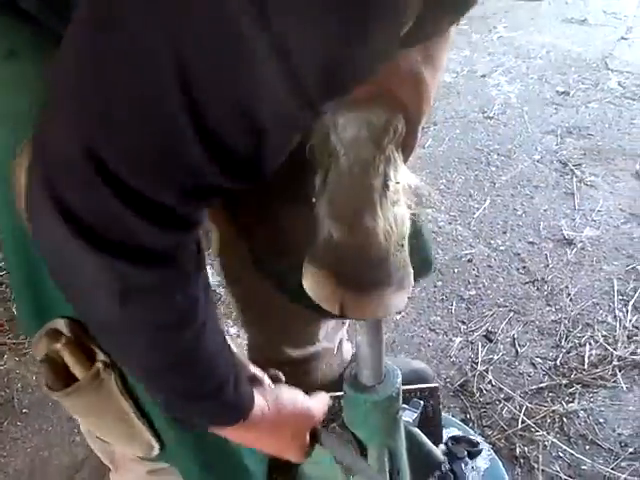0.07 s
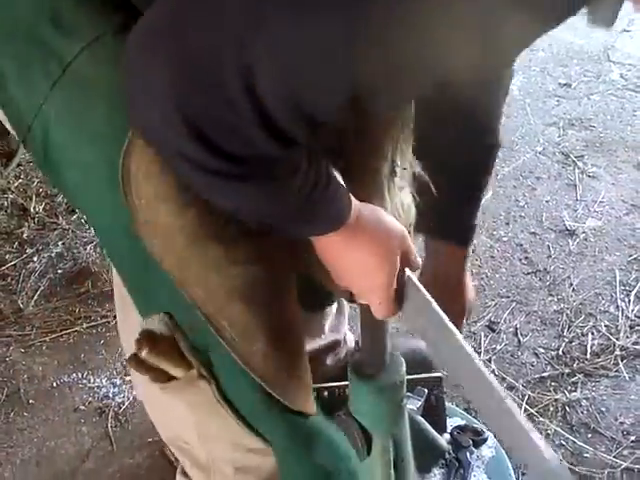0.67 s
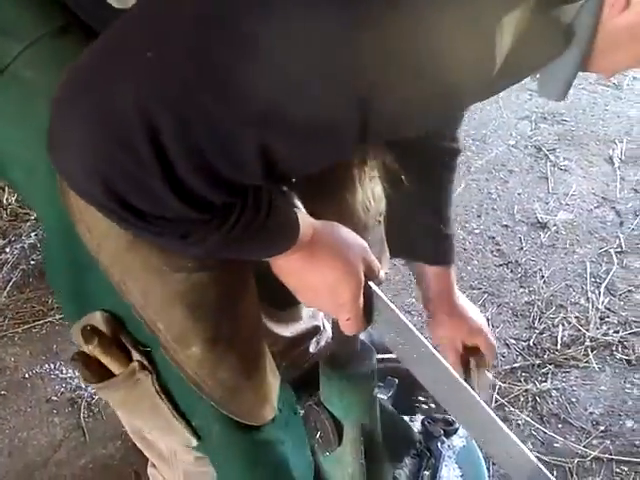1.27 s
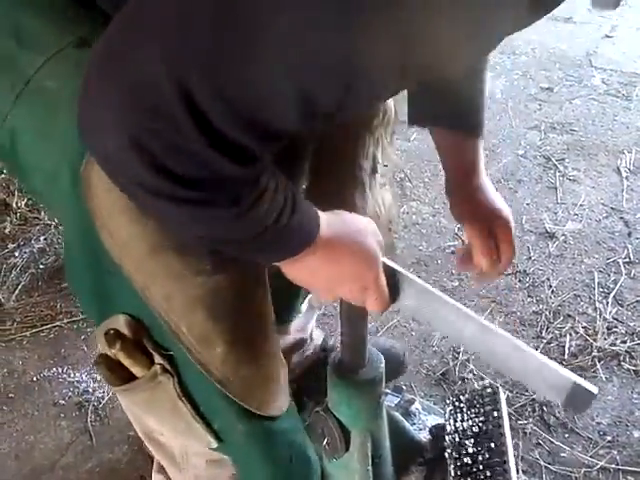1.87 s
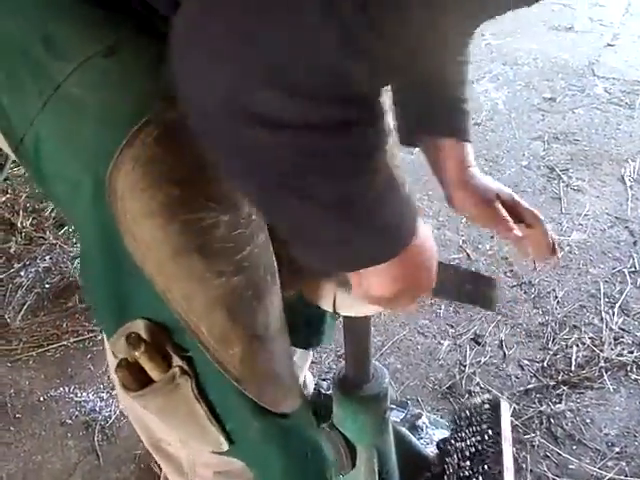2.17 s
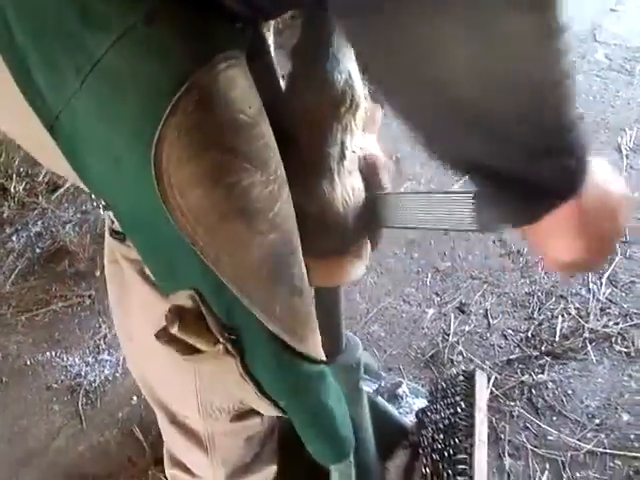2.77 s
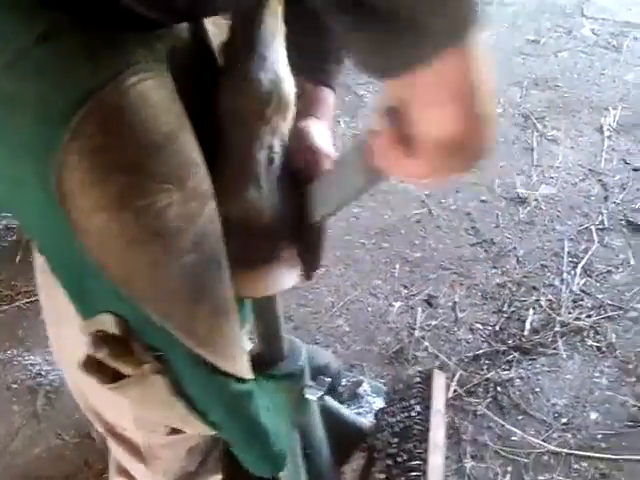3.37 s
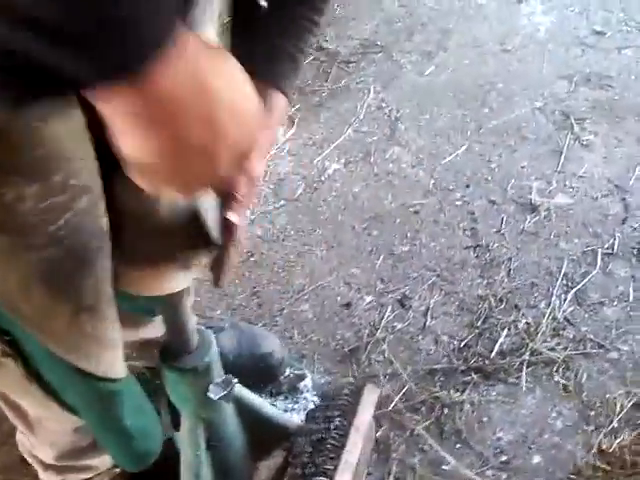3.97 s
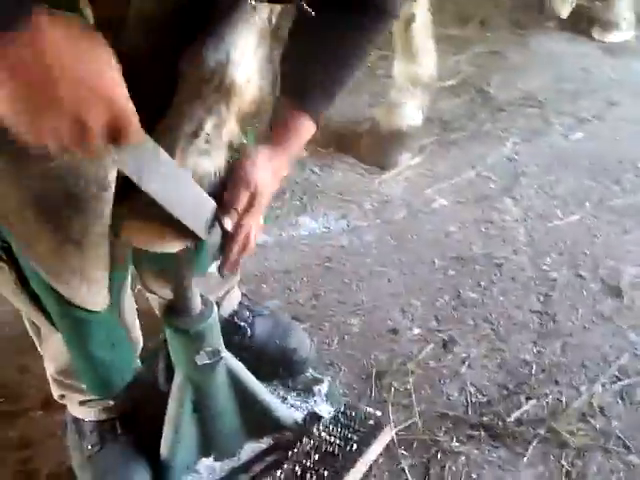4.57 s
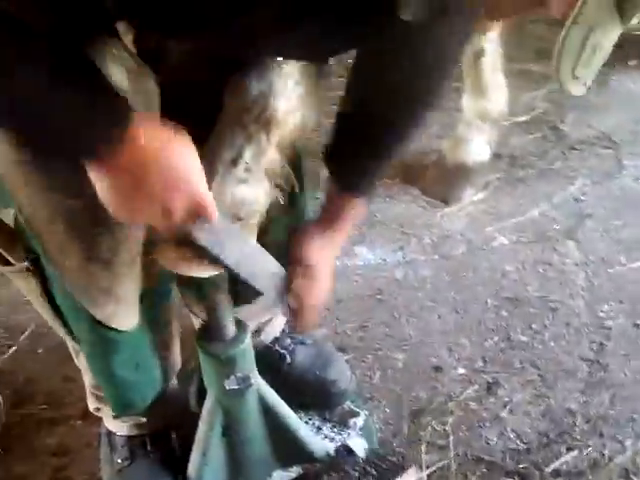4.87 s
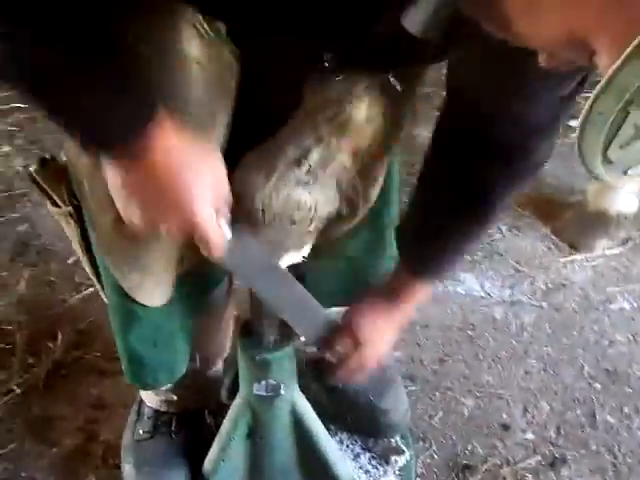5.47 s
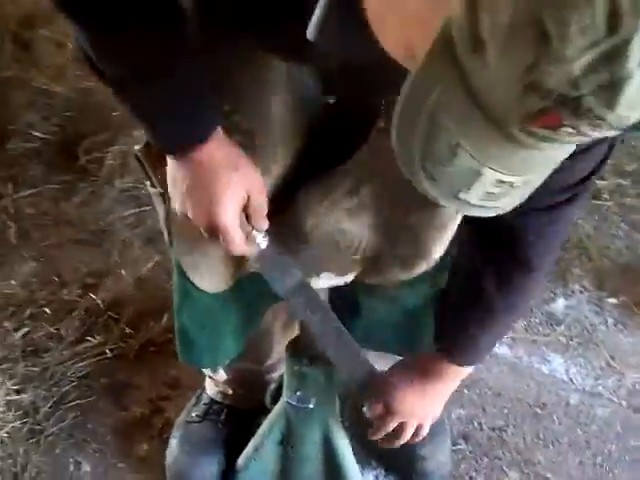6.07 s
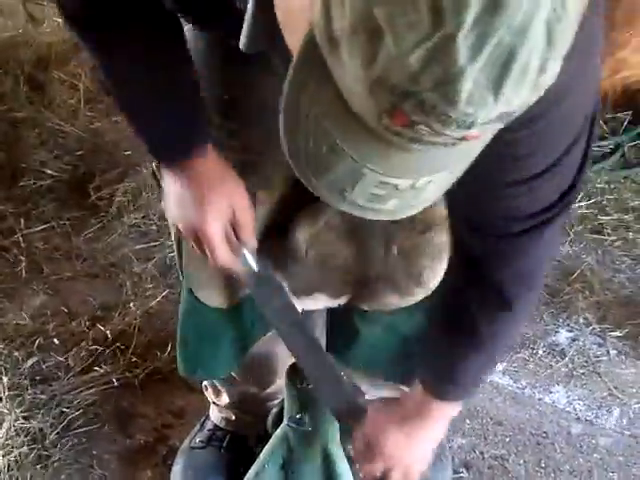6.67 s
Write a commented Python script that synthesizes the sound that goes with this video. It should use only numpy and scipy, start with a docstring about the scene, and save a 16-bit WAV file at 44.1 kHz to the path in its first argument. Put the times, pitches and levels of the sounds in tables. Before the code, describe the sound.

Steel tools clank in a tool box, then a metal rasp scrapes a horse's hoof in repeated strokes as wind buffets the microphone.

```python
"""Over soft hiss and low wind rumble, steel tools clank and slide into a farrier's tool box in a barn.
Blows knock the box and ring the steel; faint whistles sound far off. A rasp then crosses a horse's
hoof in repeated strokes: its teeth tear the horn, ring the blade and make the hoof shudder on its stand.
Wind reaches the microphone in puffs, then blows steadily and overloads it."""
import sys
import numpy as np
from scipy import signal
from scipy.fft import rfft, irfft, next_fast_len
from scipy.io import wavfile
from scipy.ndimage import map_coordinates

SR = 44100
rng = np.random.default_rng(int(sys.argv[2]) if len(sys.argv) > 2 else 0)


def master(y):
    """Save y as 16-bit WAV."""
    cut = np.clip(np.atleast_2d(y).T, -1, 1)
    pcm = np.round(cut * 32767)  # scale
    wavfile.write(sys.argv[1], SR, pcm.astype(np.int16))


N = 296793


def amp(db):
    """Decibels to gain."""
    return 10 ** (np.asarray(db) / 20)


def unit(x):
    """Scale to rms 1."""
    return x / np.sqrt(np.mean(x ** 2) + 1e-20)


def clock(size=N):
    """Seconds at each sample."""
    return np.arange(size) / SR


def noise(size=N):
    """White noise."""
    return rng.standard_normal(size)


def wobble(rate_hz):
    """Smooth random curve, rate_hz knots a second."""
    return map_coordinates(noise(int(N * rate_hz / SR) + 4), [clock() * rate_hz])


def decay(t, t60_s):
    """Fall of 60 dB in t60_s."""
    return np.exp(-np.log(1000) * t / t60_s)


def over_time(points):
    """(s, value) points read at each sample."""
    return np.interp(clock(), *np.transpose(points))


def over_hz(points, hz):
    """(Hz, value) points read on a log axis."""
    knots_hz, values = np.transpose(points)
    return np.interp(np.log(hz + 1), np.log(knots_hz + 1), values)


def filtered(x, response):
    """x through a complex frequency response."""
    size = next_fast_len(len(x) + SR // 6)
    return irfft(rfft(x, size) * response(np.fft.rfftfreq(size, 1 / SR)), size)[:len(x)]


def coloured(x, spectrum):
    """x shaped by a spectrum, rms 1."""
    return unit(filtered(x, lambda hz: amp(over_hz(spectrum, hz))))


def resonate(x, modes):
    """x through a set of resonances, rms 1."""
    response = lambda f: sum(amp(db) * 1j * f * width / (hz * hz - f * f + 1j * f * width)
                             for hz, width, db in modes)
    return unit(filtered(x, response))


def band(x, top_hz, order, low_hz=0):
    """x band-limited, rms 1; order sets the upper slope."""
    response = lambda hz: 1 / (1 + (hz / top_hz) ** order) / (1 + (low_hz / (hz + 1)) ** 8)
    return unit(filtered(x, response))


def add(track, start_s, sound):
    """Mix a sound in at start_s."""
    part = track[round(start_s * SR):][:len(sound)]
    part += sound[:len(part)]


# Hiss envelope: (time [s], level [dB])
HISS_LEVEL = [(0, -45.5), (3.0, -41.5), (3.7, -45), (4.4, -44), (5.2, -63), (6.3, -52), (6.73, -69)]
# Hiss spectrum: (frequency [Hz], density [dB])
HISS_SPECTRUM = [(59, -42), (100, -3), (219, 5.5), (452, -5.5), (545, -8), (592, -10), (630, -11),
                 (1100, -14.5), (1850, -19), (2180, -23.5), (4050, -22), (5410, -29.5), (14000, -36)]

def background_hiss():
    """Soft, drifting hiss that recedes late on."""
    return amp(over_time(HISS_LEVEL) + 0.59 * wobble(2.97)) * coloured(noise(), HISS_SPECTRUM)


# Wind at the microphone: (time [s], strength [dB])
WIND_LEVEL = [(0, -44.5), (0.75, -42), (1.2, -47.5), (1.95, -35), (2.4, -37), (2.8, -26.5), (3.15, -38),
              (3.53, -29), (3.87, -37.5), (4.46, -27.5), (4.505, -14), (4.7, -20.5), (4.98, -22.5),
              (5.07, -30.5), (5.12, -19), (5.35, -14.5), (5.9, -17), (6.73, -19)]
# Single gusts: (time [s], strength [dB], Gaussian width [s])
WIND_GUSTS = [(1.428, -32, 0.0094), (1.58, -22, 0.0076), (1.959, -15, 0.0099), (2.045, -17.5, 0.0092),
              (2.079, -10.5, 0.0052), (2.148, -19.5, 0.0053), (2.653, -12.5, 0.0096), (2.707, -22, 0.0026),
              (3.999, -21.5, 0.004), (4.166, -3, 0.0053), (4.42, -17.5, 0.008), (4.502, -5.5, 0.0036),
              (4.54, 2.5, 0.0073), (4.628, -3.5, 0.0083), (4.977, -17, 0.012), (4.999, -1, 0.0054),
              (5.196, -3.5, 0.0053), (5.263, -8, 0.026), (5.317, -2, 0.013), (5.457, 1, 0.0033),
              (5.497, 5.5, 0.01), (5.709, 8.5, 0.0016), (5.747, -9, 0.023), (5.799, -3, 0.0027),
              (5.855, -10.5, 0.0024), (5.884, -10.5, 0.0025), (5.97, -7.5, 0.0064), (6.073, -8, 0.015),
              (6.257, -11, 0.01), (6.304, -7.5, 0.0048)]
# Light-air rumble: (frequency [Hz], density [dB])
RUMBLE_SPECTRUM = [(10, 1), (28, 3), (60, -3.5), (110, -7.5), (200, -21.5), (400, -47.5), (1000, -83)]
# Buffeting at the port: (frequency [Hz], density [dB])
BUFFET_SPECTRUM = [(12, 9), (28, -10), (80, 4.5), (160, -4), (300, -11), (550, -22.5), (1000, -35.5),
                   (2000, -67), (5000, -110)]
# Crackle of the overloading microphone: (frequency [Hz], density [dB])
CRACKLE_SPECTRUM = [(150, -54), (450, 7), (900, -4), (1500, -13), (2300, -19), (3500, -34.5), (6000, -56),
                    (12000, -78)]
# Gust core: (frequency [Hz], density [dB])
GUST_SPECTRUM = [(20, 8.5), (70, 6), (170, 5), (350, -6), (700, -24.5), (1400, -35.5), (4000, -60.5)]

def wind(turbulent_db=-16, rumble_limit_db=-15.5, buffet_db_per_db=1.46, crackle_db_per_db=3.16):
    """Light air rumbles; strong wind and gusts buffet the microphone, which overloads and crackles."""
    level_db = over_time(WIND_LEVEL)
    excess_db = level_db - turbulent_db
    swell = lambda stretch: sum(amp(db) * np.exp(-.5 * ((clock() - s) / (stretch * width_s)) ** 2)
                                for s, db, width_s in WIND_GUSTS)
    core, wake = swell(1), swell(3.7)
    push = amp(level_db) + amp(-6) * wake
    push /= np.hypot(1, push / amp(rumble_limit_db))  # levels off as the flow breaks up
    rumble = push * amp(2 * wobble(22)) * coloured(noise(), RUMBLE_SPECTRUM)
    lumps = unit(amp(2 * wobble(30)) * coloured(noise(), BUFFET_SPECTRUM))
    spits = unit(amp(7 * wobble(190)) * coloured(noise(), CRACKLE_SPECTRUM))
    buffet = amp(-16 + buffet_db_per_db * excess_db) * lumps
    crackle = (amp(-31.5 + crackle_db_per_db * excess_db) + amp(-23) * core) * spits
    puffs = amp(-1) * core * coloured(noise(), GUST_SPECTRUM)
    return rumble + buffet + crackle + puffs


def blow(t, t60_s, rattle_per_s=900, rattle_t60_s=0.14):
    """Impact burst with a brief rattle of loose contacts."""
    burst = noise(len(t)) * decay(t, t60_s)
    rattle = (rng.random(len(t)) < rattle_per_s / SR) * noise(len(t)) * decay(t, rattle_t60_s)
    return burst + amp(2) * rattle


def steel_ring(modes, t):
    """Decaying modes; each point of contact favours different ones."""
    return sum(amp(db + 2 * rng.normal()) * decay(t, t60_s) * np.sin(2 * np.pi * (hz * t + rng.random()))
               for hz, db, t60_s in modes)


# Tool box resonances: (frequency [Hz], width [Hz], level [dB])
BOX_MODES = [(526, 65, -7.5), (612, 27, 7), (824, 22, 9.5), (903, 66, 3), (990, 125, 9), (1213, 170, 4.5),
             (1346, 26, 1.5), (1490, 26, 1), (1788, 15, -9), (1757, 52, 11.5), (1836, 24, -1)]
# Low boom near 200 Hz under blows and slides: (frequency [Hz], width [Hz], level [dB])
BOOM_MODES = [(217.6, 25, 10), (282, 69, -8), (414, 21, -6.5)]
# Steel-on-steel contact: (frequency [Hz], density [dB])
CLINK_SPECTRUM = [(1500, -54), (2700, -12), (3600, 12), (4100, 2), (4700, 9.5), (5300, -10), (6500, 0.5),
                  (8000, -12.5), (14000, -41)]
# High sizzle of steel: (frequency [Hz], density [dB])
SIZZLE_SPECTRUM = [(5000, -41), (8000, -10), (9200, 16), (11000, 6.5), (14000, 7)]
# Heavy tool: (frequency [Hz], level [dB], t60 [s])
HEAVY_MODES = [(3057, -16, 0.24), (3800, -3, 0.04), (4695, -8.5, 0.15), (5840, -17.5, .2),
               (8660, -24, 0.22), (8860, -14.5, 0.099)]
# Light tool: (frequency [Hz], level [dB], t60 [s])
LIGHT_MODES = [(4447, -7, .2), (5518, -15, 0.22), (5760, -3, .14), (6560, -3, 0.14), (7700, -18, .2),
               (12840, -17, .12)]
# Blows in the box: (time [s], knock [dB], tone [Hz], thump [dB], clink [dB], sizzle [dB],
# tone within knock [dB], heavy tool [dB], light tool [dB])
TOOL_BLOWS = [(0.021, -38.5, 940, -31, -44, -54, 13, -38, -56),
              (0.03, -26.5, 990, -31.5, -44, -48, -26, -38, -40),
              (0.042, -25.5, 870, -39, -34.5, -41, -1.5, -39, -54),
              (0.295, -42, 880, -61, -50, -63, -15, -62, -72),
              (0.373, -40, 825, -43, -53, -51, -2, -67, -59),
              (0.435, -41, 820, -32, -51.5, -56.5, 16, -55, -58),
              (1.112, -31, 1290, -45, -43, -52.5, 3, -48, -58),
              (1.173, -46.5, 836, -61, -58, -63, 16, -58, -58),
              (1.207, -53.5, 970, -62, -51.5, -66, 22, -74, -62),
              (1.318, -25.5, 620, -32.5, -28, -43, -5.5, -44, -83),
              (1.325, -43, 870, -41.5, -60, -50, 20.5, -56, -64),
              (1.493, -10.5, 1250, -35, -25.5, -44, -19, -31, -41),
              (1.524, -9.5, 1020, -29.5, -23.5, -39, -30, -24.5, -37),
              (1.561, -11.5, 1000, -20.5, -33.5, -52, -6.5, -47, -63),
              (1.633, -30, 890, -27, -44, -49, 8.5, -38, -59),
              (1.699, -33, 810, -37.5, -38, -55, 0, -42, -36.5),
              (1.895, -28.5, 935, -29.5, -42, -60, 13, -59, -66),
              (2.097, -38, 870, -31, -49, -83, 3, -54, -68),
              (2.205, -44, 990, -58, -60, -75, 5.5, -70, -70),
              (3.08, -47.5, 1210, -59, -70, -70, 15, -70, -71)]

def tool_clanks(knock_t60_s=0.035, clink_t60_s=0.024):
    """Each blow knocks the box, clinks steel on steel and rings the tools, over a low thump."""
    out, t = np.zeros(N), clock(SR // 3)
    struck = lambda x: x / np.sqrt(np.mean(x[:SR // 80] ** 2))  # rms 1 over the attack
    for s, knock_db, hz, thump_db, clink_db, sizzle_db, tone_db, heavy_db, light_db in TOOL_BLOWS:
        box = amp(-5) * struck(resonate(blow(t, knock_t60_s), BOX_MODES))
        tone = resonate(noise(len(t)) * decay(t, knock_t60_s), [(hz, hz / 7, 0)])
        box += amp(tone_db - 7) * struck(tone)
        knock = amp(knock_db) * filtered(box, lambda f: 1 / (1 + 1j * f / 2300 - (f / 2300) ** 2))
        boom = resonate(blow(t, knock_t60_s), BOOM_MODES)
        thump = amp(thump_db + 3) * struck(filtered(boom, lambda f: 1 / (1 + 1j * f / 500) ** 2))
        clink = amp(clink_db) * struck(coloured(blow(t, clink_t60_s), CLINK_SPECTRUM))
        sizzle = amp(sizzle_db + 2) * struck(coloured(blow(t, clink_t60_s), SIZZLE_SPECTRUM))
        heavy = amp(heavy_db + 3) * steel_ring(HEAVY_MODES, t)
        light = amp(light_db + 1) * steel_ring(LIGHT_MODES, t)
        add(out, s, knock + thump + clink + sizzle + heavy + light)
    return out


# Far whistles: (time [s], length [s], start [Hz], end [Hz], level [dB])
WHISTLE_GLIDES = [(0.81, 0.08, 2750, 2300, -57), (2.21, 0.17, 2930, 2660, -58),
                  (2.59, 0.084, 2950, 3100, -53), (2.955, 0.064, 3230, 2850, -53)]

def whistles(waver_hz=110):
    """Thin gliding whistles, perhaps birds outside."""
    out = np.zeros(N)
    for s, length_s, start_hz, end_hz, db in WHISTLE_GLIDES:
        progress = np.clip((clock() - s) / length_s, 0, 1)
        hz = start_hz + (end_hz - start_hz) * progress + waver_hz * wobble(300)
        envelope = amp(db) * np.sqrt(np.abs(np.sin(np.pi * progress)))
        out += envelope * np.sin(2 * np.pi * np.cumsum(hz) / SR)
    return out


def friction(spread_db=4, clump_db=2.1, clump_hz=260, breaks_per_s=7000):
    """Tiny fractures and fine powdering, in clumps as rough surfaces catch."""
    breaks = (rng.random(N) < breaks_per_s / SR) * noise() * amp(spread_db * noise())
    grit = unit(breaks) + .7 * noise()
    return unit(grit * amp(clump_db * wobble(clump_hz)))


def hand_speed(peak_s, rise_s, fall_s, hold_s=0):
    """One push, 0-1: up from rest to full at peak_s, held, back to rest."""
    corners_s = [peak_s - rise_s, peak_s, peak_s + hold_s, peak_s + hold_s + fall_s]
    return np.sin(np.pi / 2 * np.interp(clock(), corners_s, [0, 1, 1, 0]))


# Tools sliding: (peak time [s], rise [s], fall [s], scrape [dB], thrum [dB], hiss [dB])
TOOL_SLIDES = [(1.095, 0.11, 0.068, -46.5, -38, -82), (1.125, .015, 0.036, -51, -51, -47),
               (1.3, 0.081, 0.07, -37, -48, -60)]

def tool_slides():
    """A sliding tool scrapes the box over a low thrum; its rough steel hisses."""
    out, rub = np.zeros(N), friction()
    box = band(resonate(rub, BOX_MODES), top_hz=1500, order=4)
    boom = band(resonate(rub, BOOM_MODES), top_hz=350, order=4)
    steel = coloured(rub, SIZZLE_SPECTRUM)
    for s, rise_s, fall_s, scrape_db, thrum_db, hiss_db in TOOL_SLIDES:
        scrape = amp(scrape_db - 2) * box + amp(thrum_db - 1) * boom + amp(hiss_db) * steel
        out += hand_speed(s, rise_s, fall_s) * scrape
    return out


def lean(peak_s, hold_s, db_per_s):
    """Gain ramp as the hand leans into a stroke; 1 at mid-hold."""
    return amp(db_per_s * np.clip(clock() - peak_s - hold_s / 2, -.5, .5))


# Tearing horn: (frequency [Hz], density [dB])
TEAR_SPECTRUM = [(800, -23), (2000, 1), (2700, -3.5), (3500, 9), (5300, -1.5), (5800, -13), (6600, 4),
                 (7700, 1), (8600, -0.5), (10400, 3.5), (12000, -11), (14000, 3)]
# Blade held flat: (frequency [Hz], width [Hz], level [dB])
FLAT_MODES = [(3450, 200, -16), (4260, 85, 0), (4650, 200, -22), (5240, 150, -24), (6550, 350, -20)]
# Blade tipped on edge: (frequency [Hz], width [Hz], level [dB])
EDGE_MODES = [(3550, 130, -7), (4150, 250, -3), (4710, 420, -4.5), (5210, 130, -0.5)]
# Blade overtones: (frequency [Hz], width [Hz], level [dB])
OVERTONE_MODES = [(6630, 780, 9), (7770, 610, 4.5), (9350, 410, 3), (10640, 1050, 7.5), (11940, 740, 9.5),
                  (12900, 2300, -8)]
# Rasp strokes: (peak time [s], rise [s], hold [s], fall [s], tear [dB], blade ring [dB],
# overtones [dB], hoof [dB], tilt [0-1])
RASP_STROKES = [(2.56, 0.22, 0.054, .14, -50.5, -68, -64, -59, .2),
                (2.655, 0.087, 0.011, 0.04, -61, -43.5, -57, -73, 0),
                (2.792, 0.022, 0.051, 0.15, -33.5, -37, -43, -47, 0),
                (3.16, 0.071, 0.074, 0.33, -74, -62, -82, -76, 0),
                (3.519, 0.17, 0.12, .075, -34.5, -44.5, -48.5, -39, .4),
                (3.985, 0.013, 0.0033, 0.012, -63, -52, -64, -74, 0),
                (4.211, 0.18, 0.057, 0.042, -39, -36.5, -36.5, -31.5, 1),
                (4.536, 0.011, 0.0064, 0.012, -44, -35.5, -41, -55, 0.87),
                (4.578, .012, 0.0064, 0.033, -59, -47, -50, -40, 0.9),
                (4.756, 0.049, 0.11, 0.072, -37, -34.5, -40.5, -37.5, 0.88),
                (4.99, 0.015, 0.036, .05, -58, -54, -61, -57, 0.6),
                (5.096, .02, 0.015, 0.11, -46, -45.5, -50.5, -54, .9),
                (5.38, 0.082, 0.028, 0.11, -40, -39, -45, -56, 0.66),
                (5.61, .07, 0.037, .14, -51, -54.5, -60, -59, 0.2),
                (5.91, 0.1, 0.091, 0.063, -47, -50, -55.5, -47, 0.2),
                (6.16, 0.079, .05, 0.09, -63, -69, -65.5, -64, .5),
                (6.49, 0.087, 0.038, 0.051, -47, -54, -58.5, -47, 0.1)]

def rasp(hiss_power=1.39, ring_power=1.53, damping_db_per_s=12):
    """Fractures hiss and ring the blade, whose modes shift as it tilts; faster is louder."""
    tear_gain, overtone_gain, flat_gain, edge_gain = np.zeros((4, N))
    for s, rise_s, hold_s, fall_s, tear_db, ring_db, overtone_db, _, tilt in RASP_STROKES:
        speed = hand_speed(s, rise_s, fall_s, hold_s)
        ring_gain = amp(ring_db) * speed ** ring_power * lean(s, hold_s, -damping_db_per_s)
        tear_gain += amp(tear_db - 3) * speed ** hiss_power
        overtone_gain += amp(overtone_db - 1) * speed ** hiss_power
        flat_gain += np.sqrt(1 - tilt) * ring_gain
        edge_gain += np.sqrt(tilt) * ring_gain
    blade = lambda modes, top_hz: band(resonate(friction(), modes), top_hz, order=10, low_hz=2900)
    tearing = tear_gain * coloured(friction(), TEAR_SPECTRUM)
    overtones = overtone_gain * blade(OVERTONE_MODES, top_hz=12700)
    hand_pressure = amp(0.43 * wobble(35))
    ring = flat_gain * blade(FLAT_MODES, top_hz=8200) + edge_gain * blade(EDGE_MODES, top_hz=5680)
    return hand_pressure * (tearing + overtones + ring)


# Horn wall of the hoof: (frequency [Hz], width [Hz], level [dB])
HORN_MODES = [(684, 190, 13), (840, 130, -13.5), (964, 140, -5.5), (1347, 88, 0.5), (1680, 250, -11),
              (1980, 240, -3.5)]
# Hollow hoof capsule: (frequency [Hz], width [Hz], level [dB])
CAPSULE_MODES = [(260, 52, 3), (368, 210, -8.5), (450, 103, -6.5)]
# Stick-slip bouts: (peak time [s], rise [s], fall [s], pitch at peak [Hz], level [dB])
HOOF_SHUDDERS = [(2.85, 0.064, 0.065, 203, -21), (2.905, .02, 0.034, 185, -23.5),
                 (3.474, 0.12, 0.063, 205, -29), (3.57, .04, 0.044, 174, -10.5),
                 (3.685, 0.021, 0.03, 184, -17.5), (4.204, 0.037, 0.033, 200, -13.5),
                 (4.13, 0.063, 0.072, 190.2, -26), (4.261, 0.01, 0.03, 212, -17),
                 (4.333, 0.0068, 0.018, 184, -18.5), (4.72, 0.09, 0.031, 187, -23.5),
                 (4.826, 0.071, 0.13, 180, -23)]

def hoof(speed_power=1.3, lean_db_per_s=21.5, climb_hz_per_s=350):
    """Wall and capsule resound at each stroke; in heavy ones the hoof sticks, slips and shudders."""
    rub = friction()
    wall = band(resonate(rub, HORN_MODES), top_hz=2300, order=6, low_hz=650)
    capsule = lambda x: band(resonate(x, CAPSULE_MODES), top_hz=530, order=8)
    drive = np.zeros(N)
    for s, rise_s, hold_s, fall_s, *_, hoof_db, _ in RASP_STROKES:
        speed = hand_speed(s, rise_s, fall_s, hold_s)
        drive += amp(hoof_db) * speed ** speed_power * lean(s, hold_s, lean_db_per_s)
    out = drive * (amp(8) * capsule(rub) + amp(1) * wall)
    jitter_hz = 10 * wobble(90)
    shaken = amp(-12) * capsule(friction())
    flutter = unit(amp(1.8 * wobble(80)))
    for s, rise_s, fall_s, hz, db in HOOF_SHUDDERS:
        pitch_hz = hz + climb_hz_per_s * (clock() - s) + jitter_hz
        swing = flutter * unit(np.sin(2 * np.pi * np.cumsum(pitch_hz) / SR))
        out += amp(db - 2) * hand_speed(s, rise_s, fall_s) * (swing + shaken)
    return out


# Rasp touching down: (time [s], click [dB], horn knock [dB])
RASP_TOUCHES = [(2.3895, -38.5, -43), (2.4586, -50, -36.5), (2.5415, -41, -39), (2.5726, -45, -48),
                (2.7325, -44, -41.5), (2.7707, -32, -51), (2.7864, -26, -48), (3.24, -43, -46),
                (4.331, -25, -41), (4.582, -28, -46)]

def rasp_ticks(click_t60_s=.02, horn_t60_s=.04):
    """Teeth meet the hoof with a dry click and a small knock from the horn."""
    out, t = np.zeros(N), clock(SR // 10)
    for s, click_db, knock_db in RASP_TOUCHES:
        click = coloured(noise(len(t)), TEAR_SPECTRUM) + 0.42 * resonate(noise(len(t)), FLAT_MODES)
        knock = resonate(noise(len(t)), HORN_MODES[1:]) * decay(t, horn_t60_s)
        add(out, s, amp(click_db) * click * decay(t, click_t60_s) + amp(knock_db) * knock)
    return out


def with_reflections(x, count=8):
    """Floor, stand and legs throw back early copies that hollow the sound."""
    delays_s = rng.uniform(.004, .018, count)
    taps = np.zeros(SR // 50)
    taps[(delays_s * SR).astype(int)] = amp(-17) * rng.choice([-1, 1], count)
    echoes = signal.fftconvolve(x, taps)[:N]
    return x + filtered(echoes, lambda hz: 1j * hz / (1j * hz + 600))  # bass passes round small things


# Barn reverberation: (frequency [Hz], t60 [s])
BARN_T60 = [(150, 0.41), (1000, 0.38), (4000, 0.22), (12000, 0.19)]

def barn_echo(x):
    """Diffuse tail, treble dying first."""
    hz, t, spectra = signal.stft(noise(SR * 3 // 4), SR, nperseg=256)
    tail = signal.istft(spectra * decay(t, over_hz(BARN_T60, hz)[:, None]), SR, nperseg=256)[1]
    impulse = np.pad(tail, (SR // 200, 0)) / np.linalg.norm(tail)
    return signal.fftconvolve(x, impulse)[:N]


def scene():
    """Tools and rasp close by, over hiss and wind; the whistles arrive only as echo."""
    clatter = tool_clanks() + tool_slides()
    filing = with_reflections(rasp() + hoof() + rasp_ticks())
    hiss = background_hiss()
    echo = barn_echo(amp(-10.5) * clatter + amp(-13.5) * filing + whistles())
    return (clatter + filing + echo + hiss + wind())[None]


def record(dry):
    """The microphone flattens loud peaks; the deepest bass and the top are cut."""
    ceiling, hardness = .35, 8
    low_hz, top_hz = 3, 14100
    clipped = dry[0] / (1 + np.abs(dry[0] / ceiling) ** hardness) ** (1 / hardness)
    coupled = filtered(clipped, lambda hz: 1j * hz / (1j * hz + low_hz))
    return filtered(coupled, lambda hz: 1 / (1 + (hz / top_hz) ** 120))[None]


dry = scene()
out = record(dry)
master(out)
```